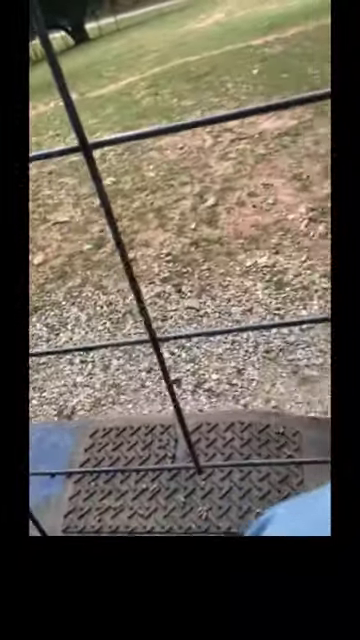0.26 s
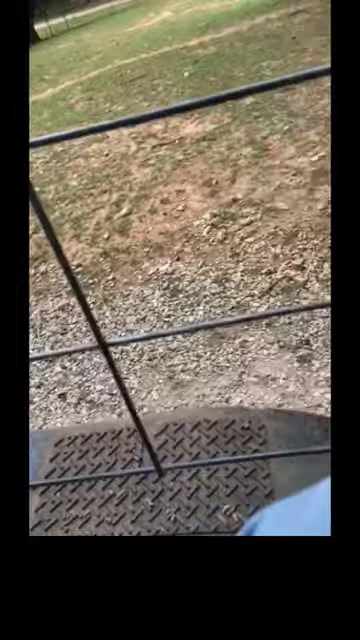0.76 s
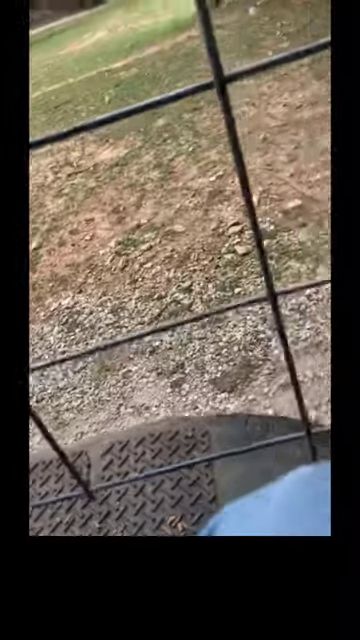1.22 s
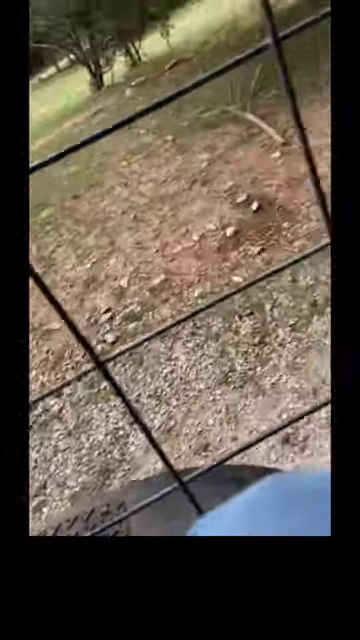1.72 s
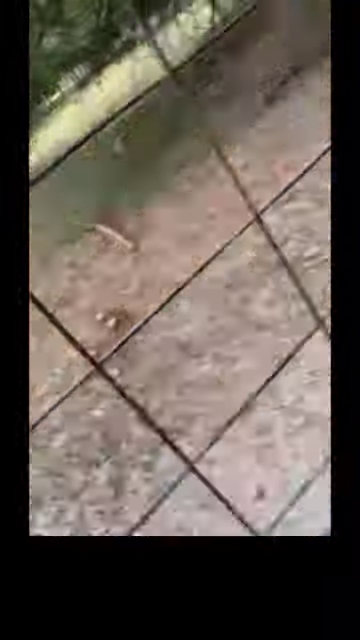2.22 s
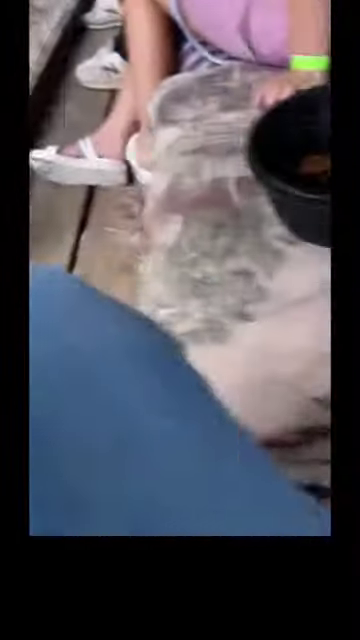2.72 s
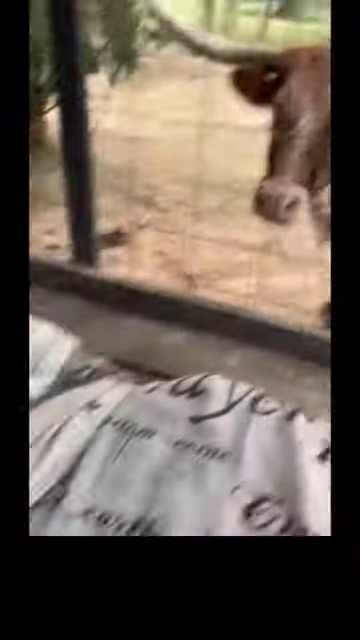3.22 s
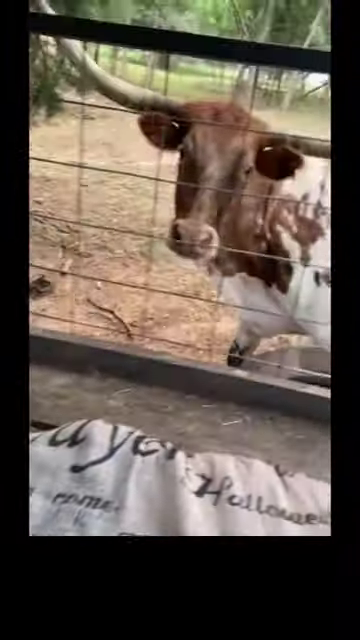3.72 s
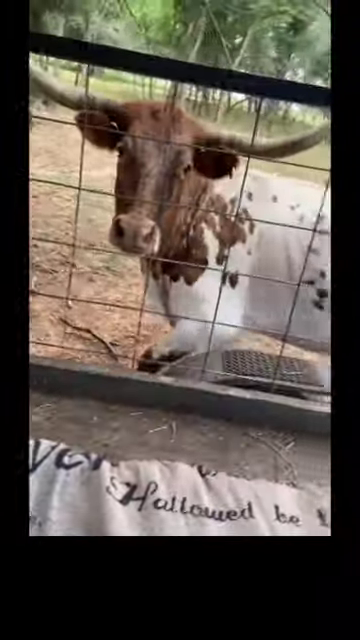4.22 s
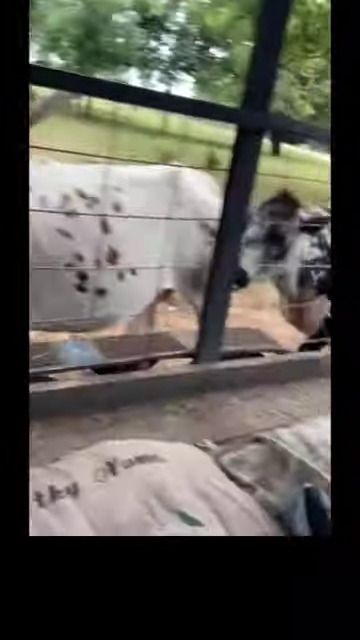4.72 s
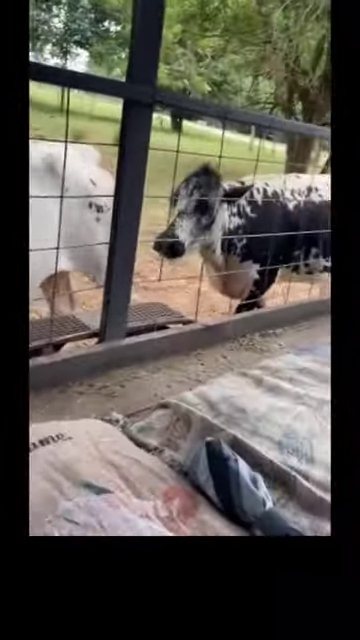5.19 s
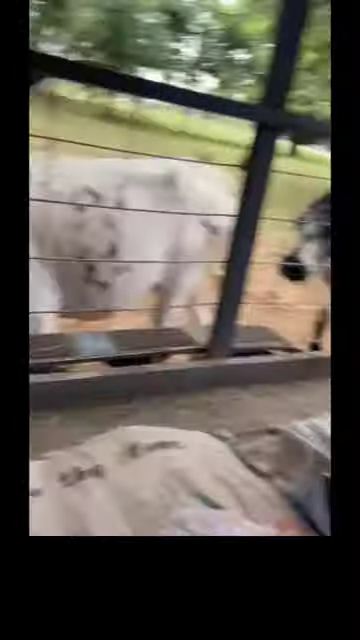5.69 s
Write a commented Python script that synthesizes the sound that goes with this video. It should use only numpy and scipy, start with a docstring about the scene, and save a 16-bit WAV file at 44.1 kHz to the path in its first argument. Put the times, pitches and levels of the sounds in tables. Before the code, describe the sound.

An engine idles close by with a low hum and a throbbing clatter throughout. Loose metal on a caged wagon gives small squeaks and chirps, with a few soft thuds. A little past halfway, hooves scuff the dirt and a nearby cow lets out one loud moo that rises in pitch, holds and drops away. The hand-held microphone is outdoors, and the clatter dulls as it turns from engine to cow.

```python
"""A cow moos once beside a caged wagon, with a three-cylinder engine idling close by.
Her vocal pulses ring chest, throat and mouth; the engine's firings drive exhaust and intake
tones and a throbbing clatter. The shaking makes the wagon's loose metal squeak and chirp,
a board thuds, and hooves scuff the ground. The hand-held stereo microphone starts out
facing the engine and turns away towards the cow."""
import sys
import numpy as np
from scipy import signal
from scipy.fft import rfft, irfft
from scipy.io import wavfile
from scipy.ndimage import uniform_filter1d

SR = 44100
rng = np.random.default_rng(int(sys.argv[2]) if len(sys.argv) > 2 else 0)


def dump(signal):
    """Clip the signal to [-1, 1] and save it as 16-bit WAV at the path in sys.argv[1]."""
    limited = np.clip(np.atleast_2d(signal).T, -1, 1)
    pcm = np.round(limited * 32767).astype(np.int16)
    wavfile.write(sys.argv[1], SR, pcm)


N = 262379
T = np.arange(N) / SR

# The engine at the turning microphone; "away" runs from 0 (facing it) to 1 (turned away):
# time_s, clatter_db, clatter_and_exhaust_away, exhaust_db, intake_db, intake_away
ENGINE_AT_MIC = [(0, -25, 0.02, -25.5, -41, 0.1), (1.0, -27.5, 0, -29.5, -44, 0),
                 (1.5, -25.5, 0, -26, -39.5, 0.54), (2.1, -25.5, 0.12, -24.5, -33.5, 0.9),
                 (2.7, -25, 0.23, -24.5, -35, 0.2), (3.1, -27, 0.38, -24, -34.5, 0.7),
                 (3.5, -26.5, 0.9, -25, -39.5, 0.87), (4.0, -24.5, 0.9, -26.5, -40.5, 0.92),
                 (5.1, -28.5, 0.97, -26.5, -41.5, 0.93), (5.95, -28.5, 1, -28.5, -42, 0.66)]


def amp(db):
    return 10 ** (np.asarray(db) / 20)


def unit_rms(x):
    return x / np.sqrt(np.mean(x ** 2) + 1e-20)


def at_hz(points, hz):
    """Reads a curve of (hz, value) points along a logarithmic frequency axis."""
    freqs, values = np.transpose(points)
    return np.interp(np.log(hz + 1), np.log(freqs + 1), values)


def curves(rows, t):
    """Each column after the first, interpolated at times t."""
    times, *columns = np.transpose(rows)
    return [np.interp(t, times, column) for column in columns]


def pan(left_db):
    """Channel gains that put the left left_db above the right."""
    return amp([[left_db / 2], [-left_db / 2]])


def add(mix, start_s, sound, pan_db):
    part = mix[:, round(start_s * SR):][:, :len(sound)]
    part += pan(pan_db) * sound[:part.shape[1]]


def resonate(x, hz, width_hz):
    """A movable resonance of gain 1: shifts hz down to zero, smooths, and shifts back."""
    carrier = np.exp(2j * np.pi * np.cumsum(hz * np.ones(len(x))) / SR)
    pole = np.exp(-np.pi * width_hz / SR)
    return 2 * (carrier * signal.lfilter([1 - pole], [1, -pole], x / carrier)).real


def resonate_in_step(x, hz, width_hz):
    """A resonance run forwards, then backwards, so the overtones stay in step."""
    hz = hz * np.ones(len(x))
    return resonate(resonate(x, hz, width_hz)[::-1], hz[::-1], width_hz)[::-1]


def colour(x, spectrum):
    return irfft(rfft(x) * amp(at_hz(spectrum, np.fft.rfftfreq(len(x), 1 / SR))), len(x))


def drift(top_hz):
    """A random wander of rms 1, mostly slower than top_hz."""
    span = int(SR / top_hz)
    return unit_rms(uniform_filter1d(uniform_filter1d(rng.standard_normal(N), span), span))


def engine_tones(cycles, orders, away, waver_db):
    """Firing orders beat as one thump; those between, from unequal cylinders, fall out of step."""
    tones = np.zeros(N)
    for order, facing_db, away_db in orders:
        level_db = facing_db + (away_db - facing_db) * away + waver_db * drift(5.1)
        offset_turns = .0385 * order ** 2 if order % 3 else -.33 + .003 * (order - 13) ** 2
        tones += amp(level_db) * np.cos(2 * np.pi * (order * (cycles + .022) + offset_turns))
    return unit_rms(tones)


def exhaust_and_intake(cycles):
    """The exhaust hums and the intake drones higher up, both at multiples of the cycle rate."""
    # Tones of each pipe: cycle_multiple, facing_db, away_db
    exhaust_orders = [(6, -19, -19), (7, -21, -14), (8, -20, -20), (9, -9, -4), (10, -12, -14),
                      (11, -16, -16), (12, 0, 1), (13, -7, 0), (14, -14, -16), (15, -1, -13),
                      (16, -14, -11), (18, -5, -7), (20, -13, -17), (21, -11, -16), (24, -17, -17)]
    intake_orders = [(45, -2, -12), (48, -12, 0.5), (49, -14, -13)]
    _, exhaust_away, exhaust_db, intake_db, intake_away = curves(ENGINE_AT_MIC, T)
    exhaust = amp(exhaust_db) * engine_tones(cycles, exhaust_orders, exhaust_away, waver_db=1.2)
    intake = amp(intake_db) * engine_tones(cycles, intake_orders, intake_away, waver_db=2.2)
    return pan(-2.1) * exhaust + pan(-5) * intake


def clatter(cycles, rumble_db=-28.5, throb_db=1.3, flicker_db=1.2, patchy_db=2.0):
    """Engine noise throbs with the firings and dulls as the microphone turns away."""
    # Clatter facing the engine, turned away, and differing between the ports: frequency_hz, density_db
    facing_spectrum = [(32, -31), (55, 24), (102, -1.5), (285, -16.5), (343, -16), (690, -18.5), (959, -22),
                       (1500, -24.5), (3150, -26.5), (5970, -39.5), (6400, -41), (7010, -101), (7860, -84),
                       (8420, -48.5), (9660, -45.5), (11600, -48.5), (13000, -102)]
    away_spectrum = [(24, -36), (40, -2.5), (98, -3.5), (184, -20), (291, -22.5), (362, -25.5),
                     (804, -33.5), (2280, -32), (5990, -46.5), (6440, -50), (7270, -109), (8010, -64),
                     (9490, -54.5), (11500, -60.5), (13000, -80)]
    side_spectrum = [(24, -51), (40, -28), (100, -5.5), (308, -14), (348, -2.5), (385, -9), (754, -10),
                     (1990, -21), (3270, -15), (5380, -29), (8210, -28.5), (9540, -46), (10300, -63),
                     (12200, -39), (15300, -50)]
    # Likeness of the ports' difference to their sum: frequency_hz, correlation
    side_likeness = [(60, -0.0057), (290, -0.96), (640, -0.66), (1400, -0.015), (15000, 0)]
    t = np.arange(N // 256 + 5) * 256 / SR
    hz = np.fft.rfftfreq(1024, 1 / SR)[:, None]
    clatter_db, away = curves(ENGINE_AT_MIC, t)[:2]
    mid_re, mid_im, side_re, side_im, patches = rng.standard_normal((len(t), len(hz), 5)).T
    patches = unit_rms(uniform_filter1d(uniform_filter1d(patches, 10, axis=0), 8, axis=1))
    likeness = at_hz(side_likeness, hz)
    mid = mid_re + 1j * mid_im
    side = likeness * mid + np.sqrt(1 - likeness ** 2) * (side_re + 1j * side_im)
    side *= amp(at_hz(side_spectrum, hz) - 12.5)
    facing_db, away_db = at_hz(facing_spectrum, hz), at_hz(away_spectrum, hz)
    away_db += at_hz(facing_spectrum, 4430) - at_hz(away_spectrum, 4360)  # both meet in the treble
    mid *= amp(facing_db + (away_db - facing_db) * away)
    mid *= np.clip(hz / 220, .36, 1)  # little noise under the exhaust tones
    cycle = np.interp(t, T, cycles)
    throb = np.cos(2 * np.pi * (cycle + .18)) + .26 * np.cos(4 * np.pi * (cycle + .064))
    throb += .49 * np.cos(6 * np.pi * cycle)
    shake_db = (throb_db * throb + flicker_db * np.interp(t, T, drift(25))) * np.clip(hz / 4000, .3, 1)
    level_db = rumble_db + (clatter_db - rumble_db) * np.clip(hz / 400, 0, 1)  # the rumble stays even
    spectra = np.array([mid + side, mid - side]) * amp(level_db + patchy_db * patches + shake_db)
    return signal.istft(spectra, nperseg=1024, noverlap=768)[1][:, :N]


def engine():
    """Three cylinders idle close by at a slightly wandering speed, three firings to a cycle."""
    # Idle speed: time_s, cycle_rate_hz
    idle_speed = [(0, 7.48), (1.2, 7.48), (1.7, 7.52), (2.2, 7.54), (2.6, 7.5), (3.0, 7.44), (3.5, 7.47),
                  (4, 7.49), (5, 7.505), (5.95, 7.49)]
    cycles = np.cumsum(curves(idle_speed, T)[0] * (1 + .001 * drift(2))) / SR
    return exhaust_and_intake(cycles) + clatter(cycles)


def twitter():
    """A faint, high band of noise flickers in pitch and level."""
    # Course of the twitter: time_s, pitch_hz, level_db
    course = [(0, 5900, -62), (2.3, 5900, -60), (2.6, 5900, -53), (3.4, 5900, -57), (4.3, 5900, -55),
              (5.05, 5900, -60), (5.2, 5900, -70)]
    hz, level_db = curves(course, T)
    level = amp(level_db + 4 * drift(30))
    return level * unit_rms(resonate_in_step(rng.standard_normal(N), hz + 120 * drift(12), 180))


def squeaks(jitter=.009, chatter=.8):
    """Metal slips on metal at a quick rate; the cage colours the overtones, two bands the most."""
    # Squeaks: start_s, level_db, length_s, slip_rate_hz, main_band_hz, second_band_hz
    slips = [(0.06, -31, 0.047, 654, 3270, 1310), (0.172, -33, 0.029, 648, 1950, 3290),
             (0.24, -29.5, 0.04, 665, 690, 3300), (0.305, -28, 0.075, 642, 3860, 1900),
             (0.3776, -30, 0.045, 643, 3850, 3230), (0.586, -33, 0.04, 635, 1890, 3200),
             (0.646, -27.5, 0.049, 643, 3860, 5140), (0.719, -30.5, 0.049, 645, 3270, 3850),
             (0.965, -32.5, 0.055, 630, 1890, 3140), (1.04, -34, .03, 650, 3250, 2600),
             (1.1, -32, 0.045, 645, 1900, 3290), (1.205, -32, .035, 717, 2160, 2860),
             (1.3677, -28.5, 0.05, 652, 3270, 1290), (1.415, -33, .03, 645, 2580, 4500),
             (1.455, -35, .03, 652, 3270, 1290), (1.523, -32, 0.036, 652, 3270, 3900),
             (1.576, -33, 0.039, 640, 3180, 3860), (1.635, -35, .035, 675, 2700, 1340),
             (2.059, -33, 0.054, 660, 3300, 2600), (2.108, -32, 0.04, 660, 3300, 2000),
             (2.19, -34, .06, 610, 3020, 2400)]
    # Response of the cage: frequency_hz, gain_db
    cage = [(600, 0.5), (1300, -3.5), (1900, -5), (2600, -3), (3300, -3.5), (4500, -2.5), (5300, -9),
            (5900, -15), (6500, -3.5), (7300, -26), (8600, -11), (10000, -20.5)]
    out, harmonics = np.zeros((2, N)), np.arange(1, 17)[:, None]
    for start_s, level_db, length_s, slip_hz, main_hz, second_hz in slips:
        count = len(np.arange(0, length_s, 1 / SR))
        noise = rng.standard_normal((2, 16, 4000))
        wobble, grip = unit_rms(uniform_filter1d(uniform_filter1d(noise, 150), 60))[..., :count]
        turns = np.cumsum(slip_hz * (1 + jitter * wobble[0])) / SR
        hz = harmonics * slip_hz
        gain_db = at_hz(cage, hz) + 9 * np.exp(-((hz - main_hz) / 300) ** 2)
        gain_db += 5.5 * np.exp(-((hz - second_hz) / 300) ** 2)
        squeak = (amp(gain_db) * (1 + chatter * grip) * np.sin(2 * np.pi * harmonics * turns)).sum(0)
        add(out, start_s, amp(level_db) * unit_rms(squeak) * signal.windows.tukey(count, .8), pan_db=-.5)
    return out


def thuds(rise_turns=1.2, t60_turns=28):
    """A board rings up softly at one pitch and dies, the higher the sooner."""
    # Thuds of the board: start_s, level_db, pitch_hz
    knocks = [(.375, -16.5, 970), (2.659, -21, 119), (4.061, -18.5, 122), (5.064, -23, 101.5)]
    out, t = np.zeros((2, N)), np.arange(0, .3, 1 / SR)
    for start_s, level_db, hz in knocks:
        turns = hz * t
        envelope = amp(level_db - 60 * turns / t60_turns) * np.minimum(turns / rise_turns, 1)
        add(out, start_s, envelope * np.sin(2 * np.pi * turns), pan_db=-1.5)
    return out


def chirps(rise_hz_per_s=2000):
    """Loose metal gives short, ragged whistles that rise slightly."""
    # Chirps: start_s, level_db, pitch_hz, length_s, noise_share
    whistles = [(1.045, -28.5, 5920, 0.043, .25), (2.46, -36, 5840, 0.037, .6),
                (2.808, -33.5, 5960, 0.052, .45), (2.915, -43, 5650, .04, .6),
                (3.327, -37, 5910, 0.035, .6), (3.368, -38, 5870, .035, .6), (3.658, -38, 5880, .03, .6),
                (4.215, -35, 4080, 0.055, .15), (4.415, -36, 5960, .033, .4),
                (4.605, -40.5, 4250, 0.13, .15), (4.772, -33, 4090, 0.035, .15),
                (5.086, -41, 5780, 0.019, .5), (5.441, -37.5, 5900, 0.063, .5)]
    out, t = np.zeros((2, N)), np.arange(0, .12, 1 / SR)
    onset = .4 * np.minimum(t / .0086, 1) * amp(-400 * t)  # leaves a faint after-ring
    for start_s, level_db, hz, length_s, ragged in whistles:
        envelope = amp(level_db) * (np.sin(np.pi * np.clip(t / length_s, 0, 1)) + onset)
        fuzz = unit_rms(resonate(resonate(rng.standard_normal(len(t)), hz, 180), hz, 180))
        tone = np.sin(2 * np.pi * (hz + rise_hz_per_s * (t - length_s) / 2) * t)
        add(out, start_s, envelope * ((1 - ragged) * tone + ragged * fuzz), pan_db=0)
    return out


def hoof_scuffs(rise_s=.025, t60_s=.21):
    """Hooves push soft puffs of grit over the ground: a quick rise and a short noisy fall."""
    # Scuffs: start_s, level_db
    steps = [(1.376, -30.5), (2.602, -31), (2.897, -31), (3.324, -31), (3.488, -25), (3.649, -27.5),
             (3.827, -26.5), (4.022, -31), (5.61, -36)]
    # Sliding grit: frequency_hz, density_db
    grit_spectrum = [(300, -20), (700, -8), (2200, -3), (5000, 0), (8500, -7.5), (11000, -7.5),
                     (15000, -27)]
    out, t = np.zeros((2, N)), np.arange(8192) / SR
    for start_s, level_db in steps:
        grit = unit_rms(colour(rng.standard_normal(len(t)), grit_spectrum))
        envelope = amp(level_db - 60 * t / t60_s) * np.minimum(t / rise_s, 1)
        add(out, start_s, envelope * grit, pan_db=1)
    return out


def vocal_tract(drive, t, waver_db=1.2):
    """The cow's mouth, nose and throat ring at resonances that wander with jaw and tongue."""
    # Mouth resonances: time_s, jaw_hz, jaw_db, nose_hz, tongue_hz, tongue_db, upper_hz, upper_db
    mouth = [(3.47, 960, -4, 1080, 1460, -9, 2150, 6), (3.58, 955, -3, 1090, 1450, -9, 2280, -2),
             (3.68, 930, 7, 1180, 1510, -5, 2350, 10), (3.76, 920, 8, 1210, 1540, 7, 2090, 3),
             (3.86, 900, 8.5, 1234, 1530, 2, 1990, -5), (3.94, 895, 7, 1174, 1450, -7, 1990, -6),
             (4.05, 875, 14, 1170, 1480, 0.5, 1960, -3.5), (4.18, 900, 5.5, 1096, 1390, 8, 1980, -2),
             (4.3, 934, 6, 1110, 1444, 2, 1950, 0), (4.37, 945, 5, 1066, 1420, 9, 1970, -0.5),
             (4.5, 930, 11.5, 1106, 1530, -4, 2010, 5), (4.62, 960, 9, 1140, 1418, 6.5, 1960, 1),
             (4.75, 980, 9, 1170, 1445, 9.5, 1908, -1), (4.87, 925, 8, 1164, 1376, 10.5, 1920, 3),
             (4.97, 965, 10, 1058, 1445, 4, 1890, 2), (5.04, 890, 9.5, 1156, 1470, 7, 1950, -1.5),
             (5.09, 906, 4, 1175, 1466, 1, 2000, 7)]
    # Two high throat resonances: time_s, low_hz, low_db, high_hz, high_db
    throat = [(3.47, 2520, -17, 2950, -3), (4.0, 2520, -10, 2950, -18), (4.15, 2460, -9, 2930, -29),
              (4.3, 2510, -13, 2938, -22), (4.45, 2600, -9, 2950, -17), (4.6, 2350, -2, 2900, -14),
              (4.75, 2482, -11, 3000, -14), (4.9, 2498, -6, 2959, -15), (5.09, 2540, -20, 2950, -24)]
    jaw_hz, jaw_db, nose_hz, tongue_hz, tongue_db, upper_hz, upper_db = curves(mouth, t)
    low_hz, low_db, high_hz, high_db = curves(throat, t)
    nose_db = curves(COW_CALL, t)[-1]
    ring = amp(jaw_db) * resonate_in_step(drive, jaw_hz, width_hz=105)
    ring += amp(nose_db) * resonate_in_step(drive, nose_hz, width_hz=121)
    ring += amp(tongue_db) * resonate_in_step(drive, tongue_hz, width_hz=160)
    ring = signal.sosfiltfilt(signal.butter(3, 810, "highpass", fs=SR, output="sos"), ring)
    for hz, width_hz, db in (upper_hz, 175, upper_db), (low_hz, 180, low_db), (high_hz, 180, high_db):
        ring += amp(db + waver_db * drift(18)[:len(t)]) * resonate_in_step(drive, hz, width_hz)
    return ring


def moo(jitter=.0028, creak=.045, creak_s=.045, breath=.055, shimmer_db=1.0, edge_db=-28.5):
    """Vocal pulses and puffs of breath ring the tract and, as the mouth opens, the chest."""
    # Chest resonances: frequency_hz, width_hz, gain_db
    chest_modes = [(168, 52, -2.5), (346, 67, -5.5), (576.5, 34, 3), (782, 77, -13)]
    # The sharp edge of each pulse: frequency_hz, density_db
    edge_spectrum = [(2900, -34), (3600, -41), (4500, -26), (5200, -4), (5800, -23), (6500, -5),
                     (7500, -9.5), (9000, -13.5), (10500, -19), (13000, -20.5), (14500, -19), (16000, -29)]
    # The cow's place in the stereo image: frequency_hz, left_minus_right_db
    balance = [(60, -2), (500, 2), (1600, 1), (15000, 5.5)]
    t = np.arange(COW_CALL[0][0], COW_CALL[-1][0], 1 / SR)
    hz, effort_db, opening, _ = curves(COW_CALL, t)
    unevenness = jitter + creak * np.exp((t - t[-1]) / creak_s)  # grows as the call lets go
    turns = np.cumsum(hz * (1 + unevenness * drift(224)[:len(t)])) / SR
    pulses = sum(np.cos(2 * np.pi * k * turns - 1.1) for k in range(1, 111))  # each dips, then peaks
    folds = unit_rms(pulses / np.sqrt(hz))
    puffs = unit_rms(np.exp(-(turns % 1) / 4.7) * rng.standard_normal(len(t)))
    drive = folds * amp(shimmer_db * drift(65)[:len(t)]) + breath * opening * puffs
    ring = vocal_tract(drive, t)
    chest = sum(amp(db) * resonate(resonate(drive, mode_hz, width_hz), mode_hz, 2 * width_hz)
                for mode_hz, width_hz, db in chest_modes)
    chest *= amp(np.interp(opening, [0, 1], [-30.5, 1.5]))
    edge = unit_rms(colour(folds + .5 * puffs, edge_spectrum))
    voice = (ring + chest) / ring.std() + amp(edge_db) * edge
    out = np.zeros(N)
    out[round(t[0] * SR):][:len(t)] = amp(effort_db) * voice * signal.windows.tukey(len(t), .02)
    left_gain = amp(at_hz(balance, np.fft.rfftfreq(N, 1 / SR)) / 2)
    return irfft(rfft(out) * np.array([left_gain, 1 / left_gain]), N)


def mic_ports(x, left_lead):
    """The microphone's two ports hear one sound in unlike phase; some bands cancel in the sum."""
    half_shift = np.exp(.5j * at_hz(left_lead, np.fft.rfftfreq(N, 1 / SR)))
    return irfft(rfft(x) * np.array([half_shift, 1 / half_shift]), N)


def scene():
    """Engine, cow, wagon and hooves as they reach the microphone."""
    # Phase lead of the left port, for the cow and for wagon and hooves: frequency_hz, lead_rad
    cow_lead = [(0, 0), (2000, 0), (4000, .8), (5800, .2), (6800, 2.7), (8200, 2.9), (9000, 6),
                (16000, 6.6)]
    wagon_lead = [(0, 0), (1720, 0.0), (2330, 0.6), (3880, 0.6), (4310, 1.0), (4910, 0.1), (5430, 0.2),
                  (6630, 3.2), (8180, 3.1), (9560, 6.2), (11600, 6.4), (12500, 9.5), (14600, 9.3),
                  (15100, 12.1)]
    mix = engine() + thuds() + mic_ports(moo(), cow_lead)
    return mix + mic_ports(squeaks() + chirps() + twitter() + hoof_scuffs(), wagon_lead)


def record(dry, low_cut_hz=50, top_hz=15250):
    """The microphone drops the deepest bass and the highest treble."""
    low_cut = signal.butter(3, low_cut_hz, "highpass", fs=SR, output="sos")
    faded = signal.sosfilt(low_cut, dry) * signal.windows.tukey(N, .002)
    padded = np.pad(faded, ((0, 0), (255, 255)), "reflect", reflect_type="odd")
    band_limit = signal.firwin(511, top_hz, window=("kaiser", 9), fs=SR)
    return signal.oaconvolve(padded, band_limit[None], "valid")


# The cow's call: time_s, pitch_hz, effort_db, mouth_opening (0-1), nose_db
COW_CALL = [(3.44, 77.7, -70, 0.7, -6), (3.5, 84.9, -35, .3, -10), (3.6, 87.5, -34, .3, 2.5),
            (3.66, 88.6, -32.5, 0.2, 6), (3.75, 101.5, -33.5, 0.7, 12.5), (3.84, 119.5, -27.5, 0.2, 10),
            (3.9, 141.6, -26.5, 0.7, 9), (3.93, 149.9, -20.5, 0.4, 9), (3.95, 155, -22, 0.74, 12),
            (3.97, 161.4, -21, 0.8, 7.5), (4.03, 170.5, -21.5, 0.95, 12), (4.1, 179, -16, 1, 10.5),
            (4.28, 188, -15, 0.9, 10.5), (4.37, 192.1, -17, 0.92, 3), (4.45, 194.8, -17.5, .95, 14),
            (4.53, 196.2, -18.5, 1, 15), (4.636, 192.1, -17, 0.94, 0), (4.86, 188.1, -16, 1, -4),
            (4.97, 183.2, -14, 0.97, 8), (5.0, 178, -13.5, 0.94, 7), (5.034, 171.4, -14.5, 1, 14.5),
            (5.072, 124.6, -27, 0.94, 12.5), (5.1, 110, -36, 0.95, 13)]

dry = scene()
out = record(dry)
dump(out)
```